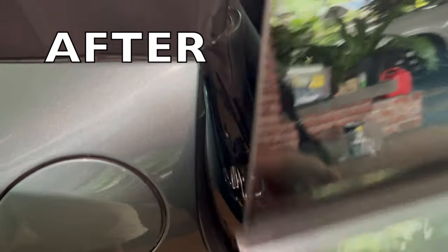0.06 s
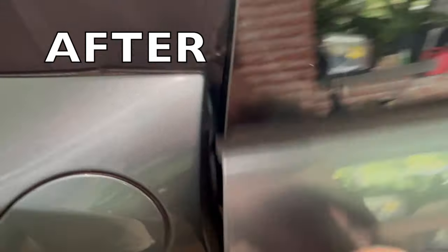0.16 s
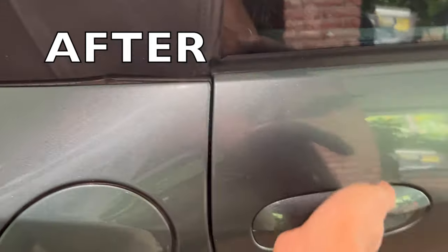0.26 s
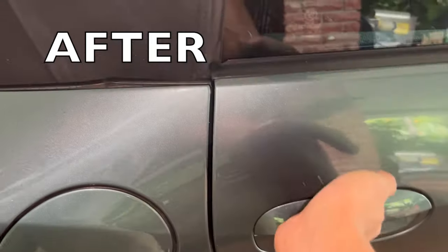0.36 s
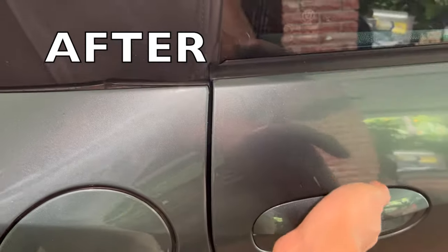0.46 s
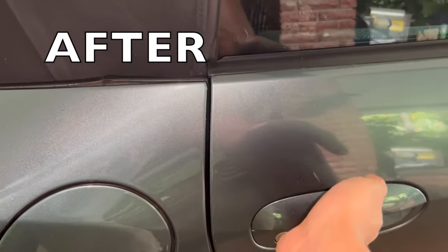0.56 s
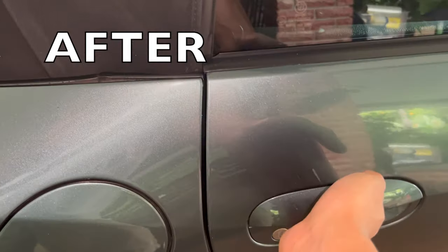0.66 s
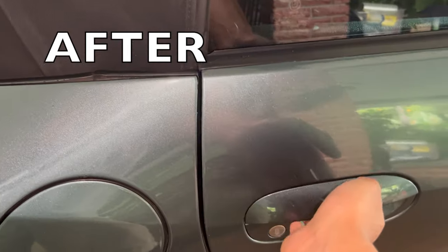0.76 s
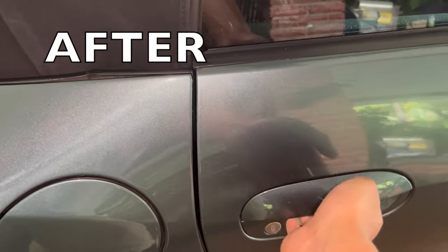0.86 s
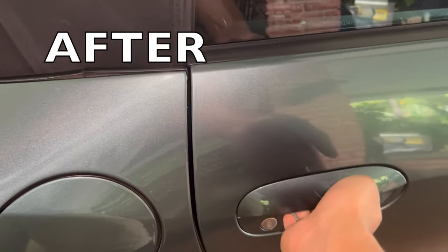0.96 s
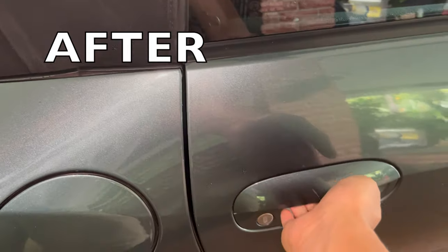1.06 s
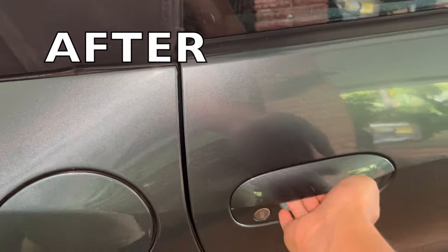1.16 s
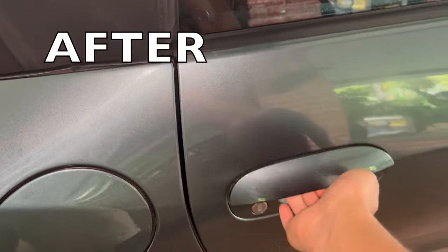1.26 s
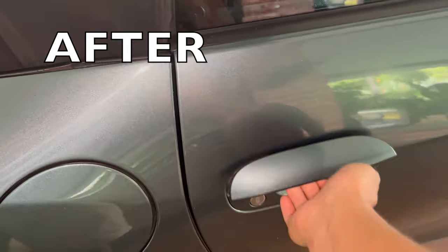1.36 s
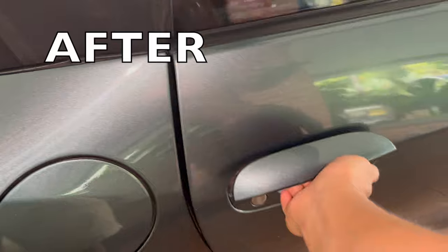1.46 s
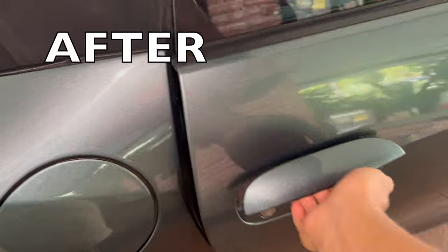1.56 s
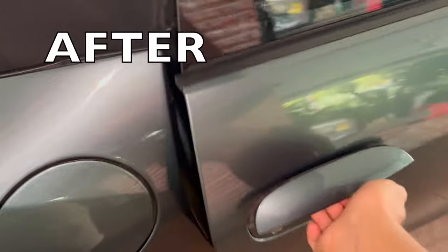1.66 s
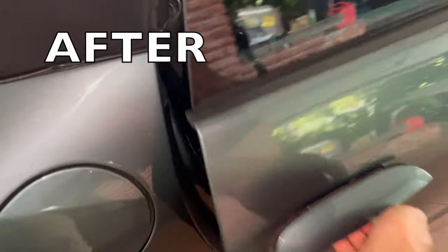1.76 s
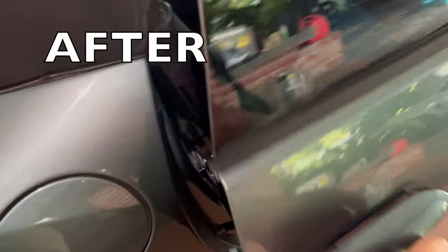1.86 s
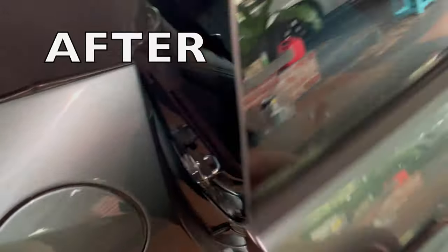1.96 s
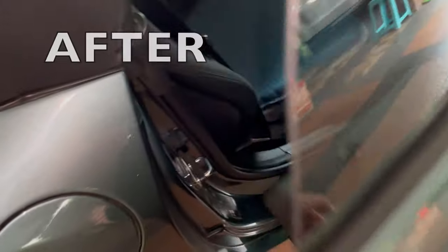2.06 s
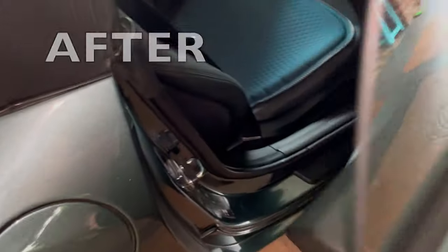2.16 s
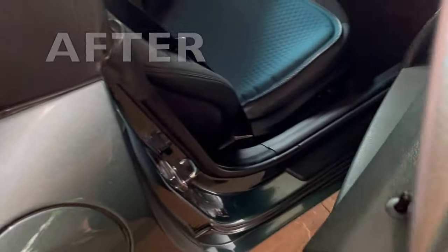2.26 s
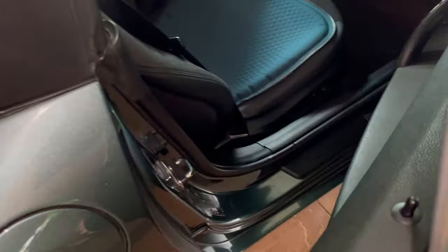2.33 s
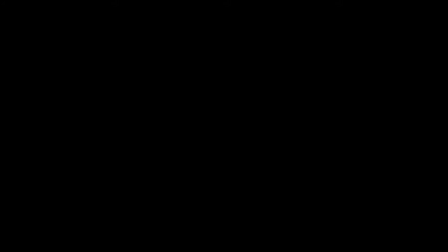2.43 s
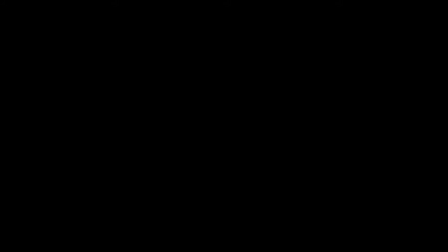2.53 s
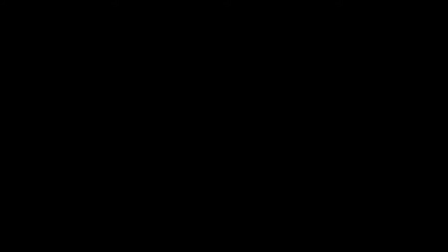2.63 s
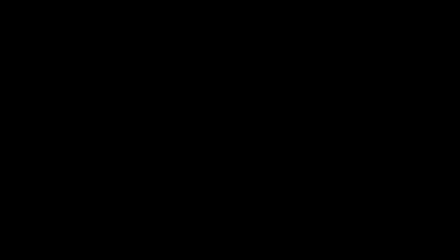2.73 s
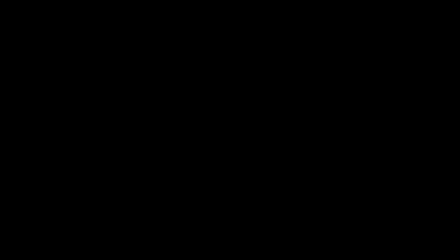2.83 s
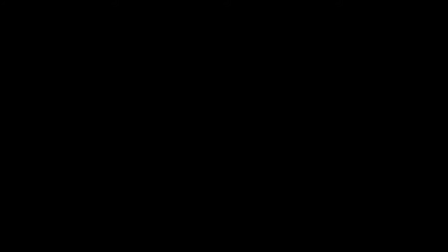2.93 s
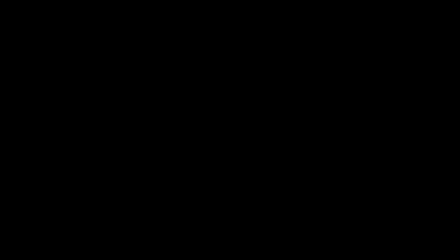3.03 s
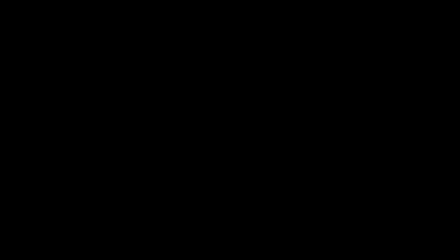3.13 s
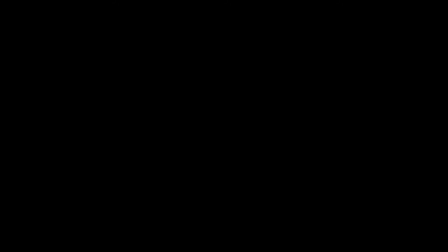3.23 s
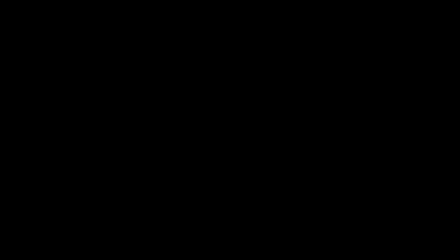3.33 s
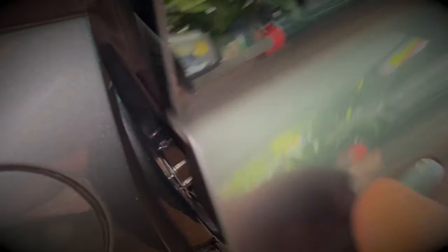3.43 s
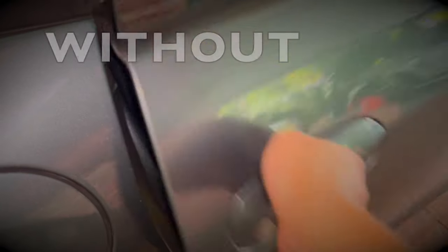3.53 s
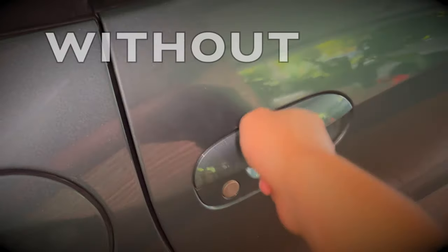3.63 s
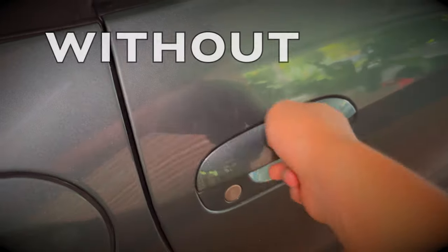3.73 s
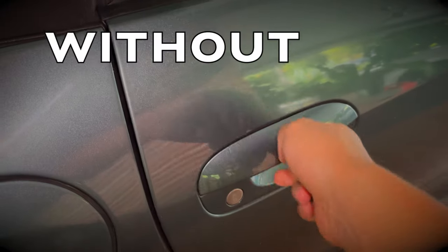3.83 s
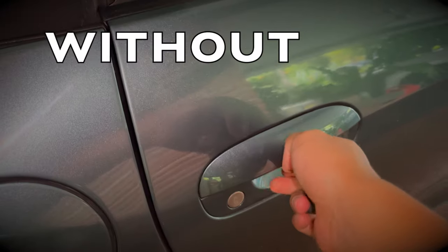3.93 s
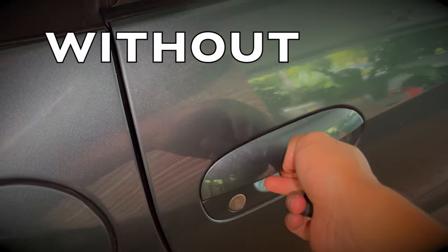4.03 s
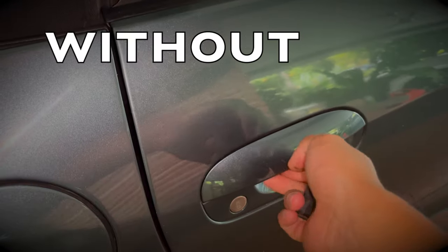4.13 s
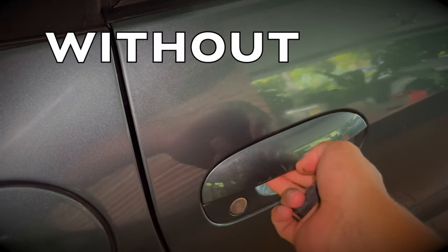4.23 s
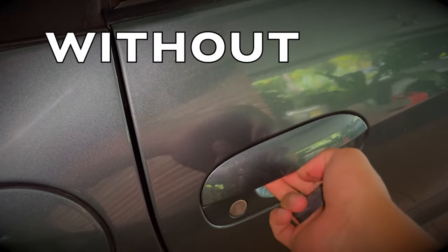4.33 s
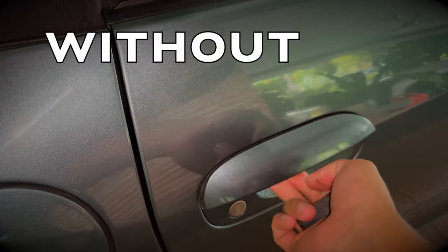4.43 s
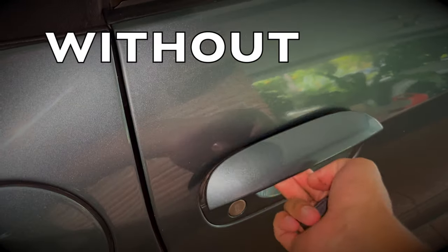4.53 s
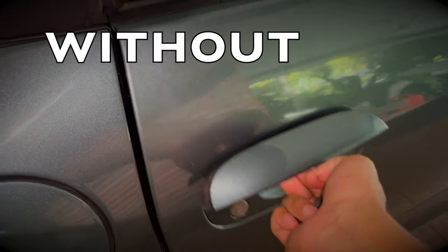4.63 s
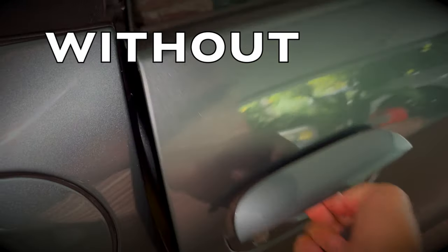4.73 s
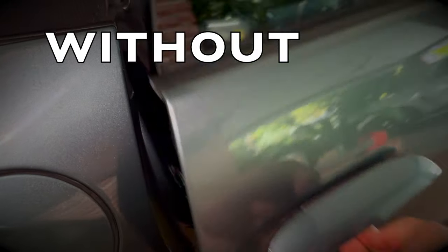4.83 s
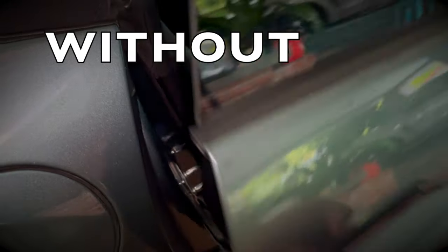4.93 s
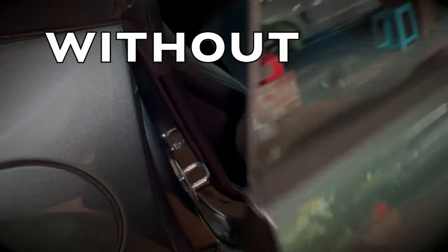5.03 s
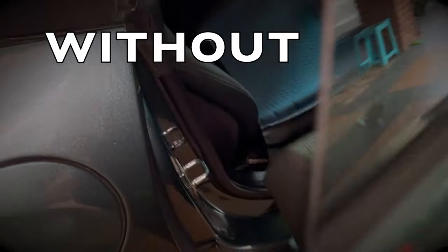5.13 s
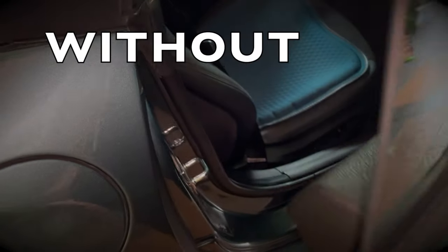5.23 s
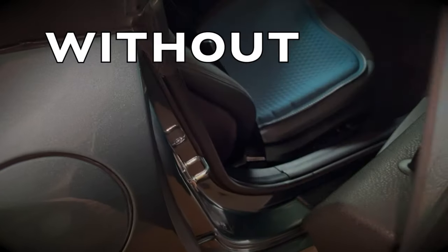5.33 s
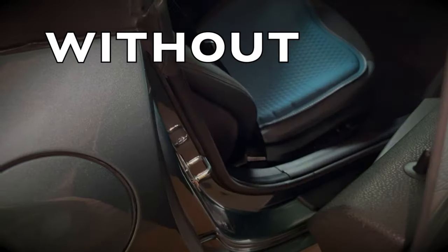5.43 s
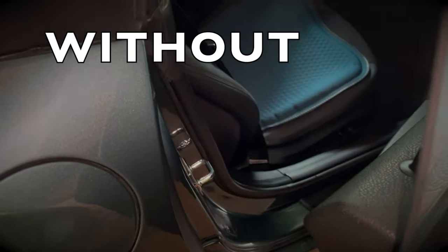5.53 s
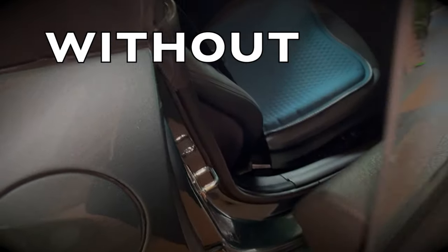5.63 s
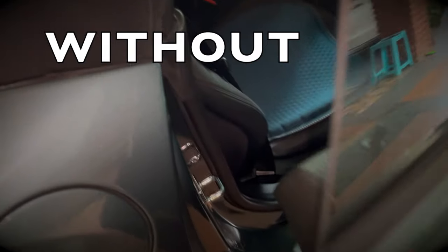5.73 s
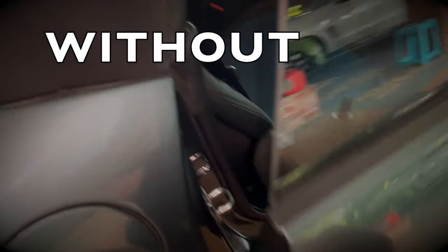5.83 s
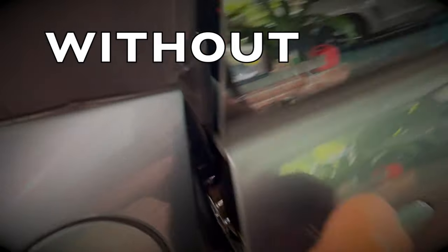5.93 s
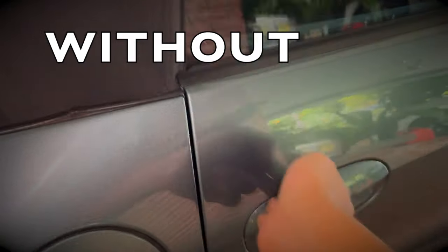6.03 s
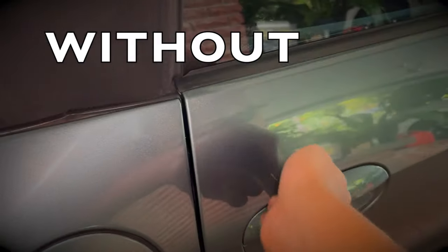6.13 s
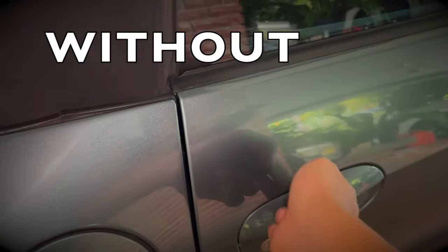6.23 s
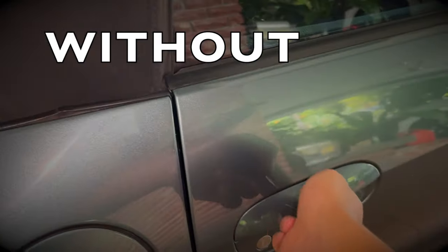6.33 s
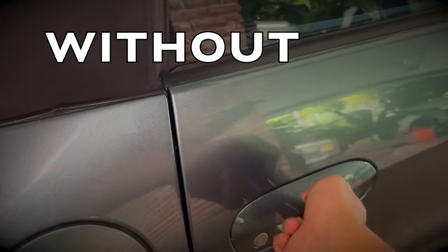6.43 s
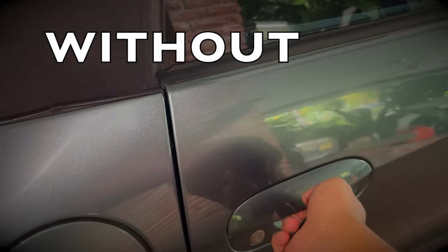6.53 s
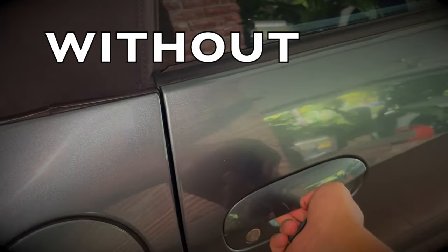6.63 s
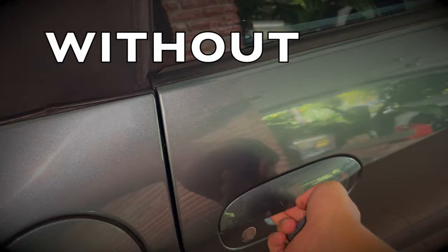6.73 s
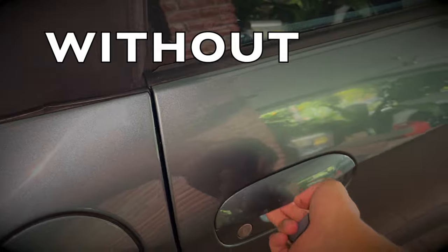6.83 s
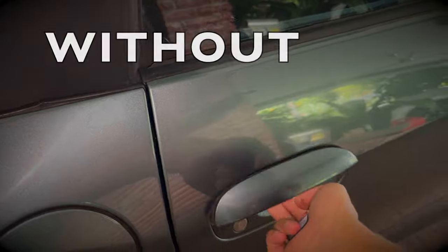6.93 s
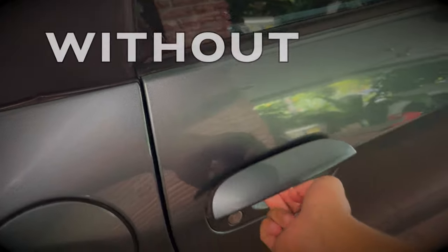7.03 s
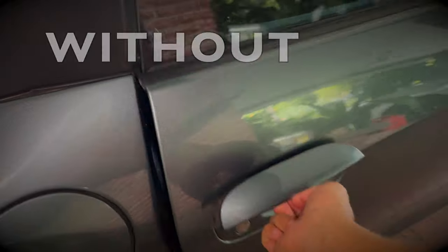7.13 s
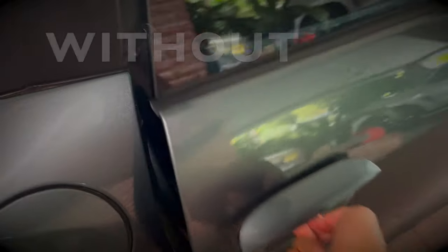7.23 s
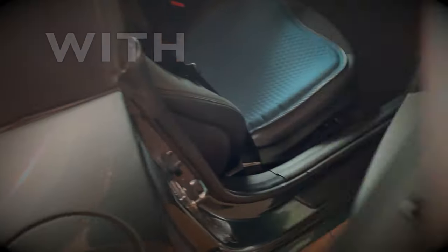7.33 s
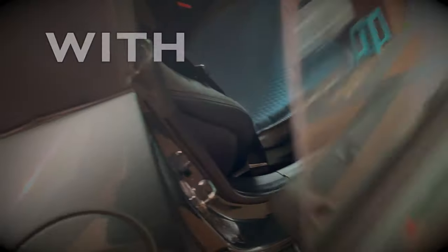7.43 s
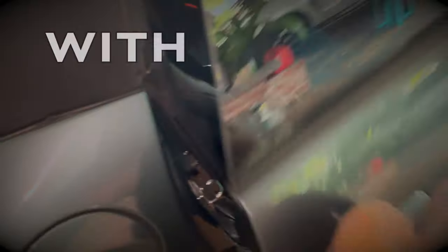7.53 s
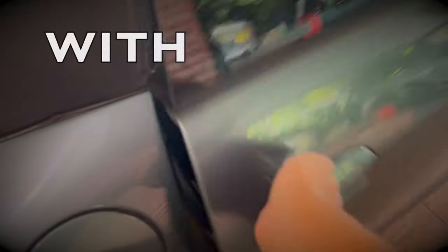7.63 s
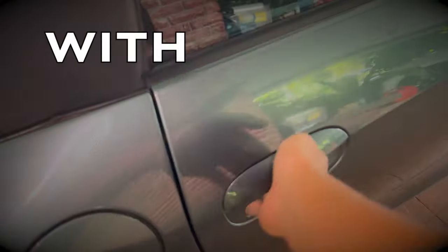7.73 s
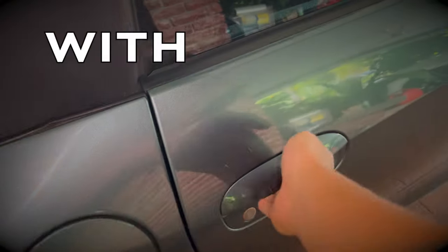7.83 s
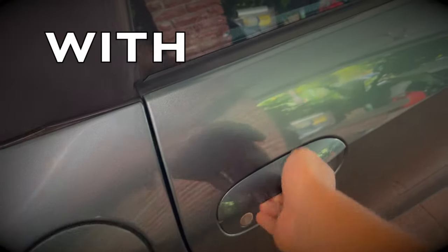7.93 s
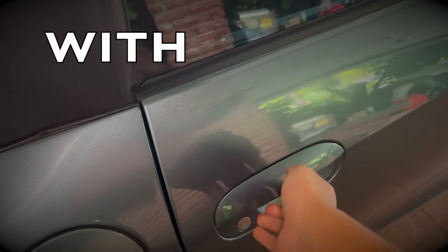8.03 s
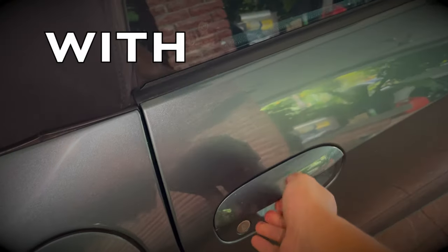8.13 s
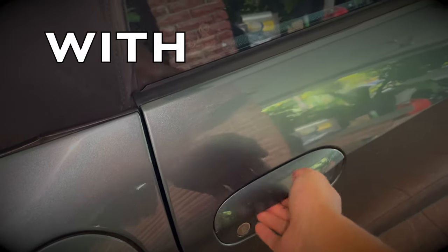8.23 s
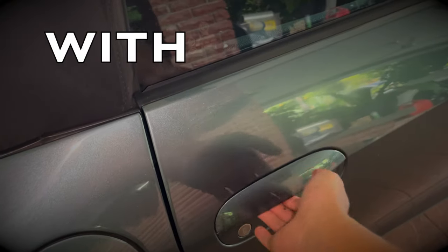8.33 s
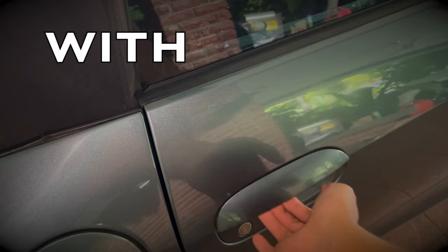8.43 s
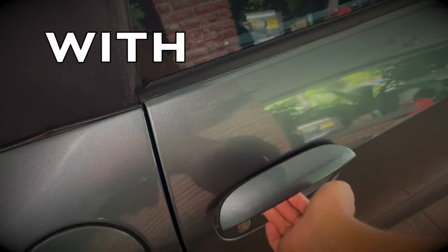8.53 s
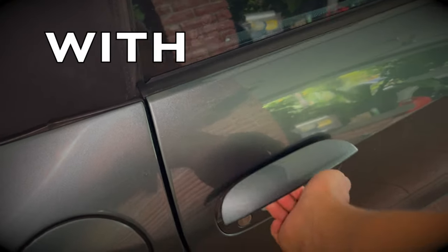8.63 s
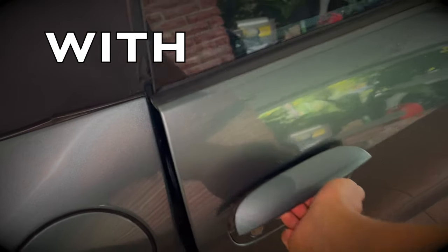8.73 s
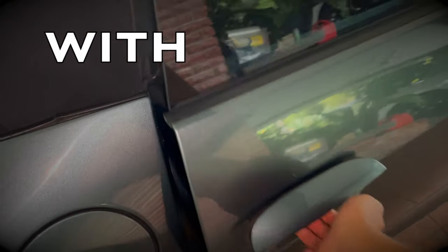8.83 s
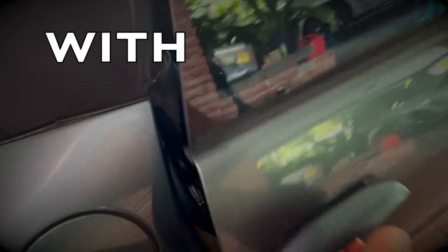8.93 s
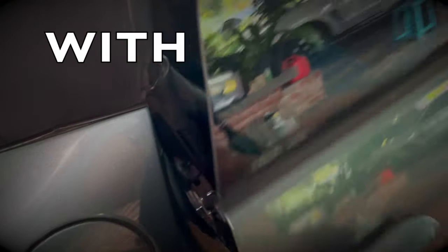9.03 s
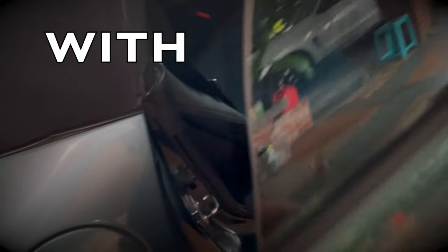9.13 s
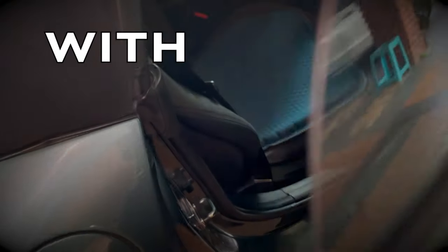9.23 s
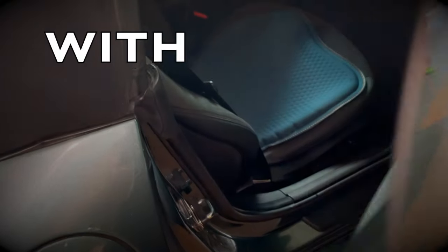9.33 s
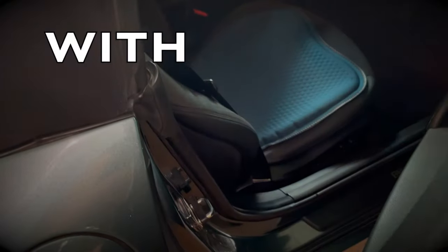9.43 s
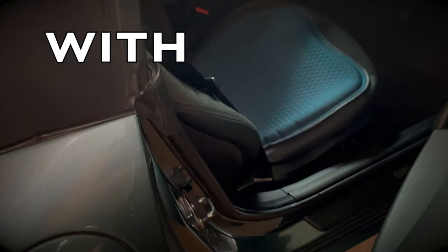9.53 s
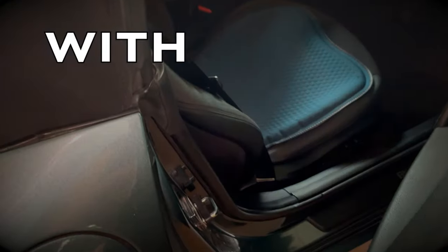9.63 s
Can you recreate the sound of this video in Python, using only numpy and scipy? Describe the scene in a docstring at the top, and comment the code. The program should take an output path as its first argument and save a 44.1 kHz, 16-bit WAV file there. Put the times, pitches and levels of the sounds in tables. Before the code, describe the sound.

A car door slams, its handle clicks and the latch pops open, again and again, with a second of dead silence after the first round.

```python
"""Under a carport with brick walls, a car door is slammed, its lock motor settles, the handle is pulled, the latch lets
go and the door swings open, four times over; three times one hears it reach its stop. Each contact is a burst of noise
(crack) plus decaying sine waves for latch plate, door panel and cabin air, with fading noise as the walls' answer.
Shaped noise makes the distant traffic and air. A phone close by squashes the loudest blows; the sound is cut for a second.
"""
import sys
import numpy as np
from scipy import signal
from scipy.fft import rfft, irfft, next_fast_len
from scipy.io import wavfile
from scipy.ndimage import uniform_filter1d

SR = 44100
rng = np.random.default_rng(int(sys.argv[2]) if len(sys.argv) > 2 else 0)


def transcribe(signal):
    """Save signal, clipped to [-1, 1], as a 16-bit WAV file at the path in sys.argv[1]."""
    frames = np.atleast_2d(signal).T
    limited = np.clip(frames, -1, 1)
    pcm = np.round(limited * 32767).astype(np.int16)
    wavfile.write(sys.argv[1], SR, pcm)


N = 426447
CONTACT_LENGTH = 36000  # longest sound of one contact [samples]
SPLIT_HZ = 5200  # above this a crack is only a brief snap

# When each action happens, and how it differs from its usual self:
# (time [s], stretch of the delays [factor], extra crack [dB], extra knock [dB], extra thud [dB])
SLAM_TIMES = [(.2461, 0.98, -1, 0, 0), (3.5964, 1.057, 0, 2, 0.5), (6.0153, .98, 1, 4, 4),
              (7.6876, 1.03, -3.5, -2, -3)]
LOCK_TIMES = [(.7735, 1, 2, 0, -1), (4.1155, 1.02, 5, 0.07, 1.4), (6.5235, 1.01, 1, -0.73, -2),
              (8.2095, 1.03, 4, 0.97, 0)]
HANDLE_TIMES = [(1.224, 1.06, -5, -5, -11), (4.4106, .82, 0, 3, 2.5), (6.882, .95, -1, 0, 2),
                (8.4449, 1.12, 2, 1.5, 3.5)]
RELEASE_TIMES = [(1.4268, 1.0, -2, -.5, 0), (4.6228, .96, 2.5, 1, 0), (7.0664, 1.04, 0.5, .5, -1),
                 (8.6395, 1.02, -1, -1, 1)]
RATTLE_TIMES = [(1.5998, 1.38, 4.5, 8, 2.5), (4.792, 1.06, 0, -8, -0.5), (7.229, 0.95, -2, -3.5, 1),
                (8.8181, .92, 4, 11, 6)]
STOP_TIMES = [(2.1015, 1.22, -3, 0, -3), (5.1843, 1.03, -1, -1.3, 0), (9.2917, .74, 2.5, 0.028, 2)]
# Actions that keep their usual pace: (time [s], extra crack [dB], extra knock [dB], extra thud [dB])
TICK_TIMES = [(1.3087, 4, 9, -6), (4.4789, -12, -2, 11), (6.9576, 0, 7, 3), (8.5381, -16, -7.5, 0)]
TAP_TIMES = [(.1374, -15, -22, -18.5), (.1962, -23, -18, -8), (4.703, 0, 2, -4.5), (7.1494, -2, 5.5, 2),
             (9.2753, 0, -18, -23)]
FALL_BACK_TIMES = [(1.5471, -1, 1, 0.24), (4.7394, 4.5, -1.9, 0.96), (7.1885, 3, -2.6, -1.8),
                   (8.7696, -6, 2.5, 0.72)]

# The run of contacts inside each action, at its usual pace and strength:
# (delay [s], crack [dB], knock [dB], panel [dB], cabin [dB], snap over the crack's treble [dB])
SLAM_CONTACTS = [(0, -7.5, -10, -15, -32, -15), (.022, -2, -10.5, -15, -7, -2),
                 (.049, -6.5, -11, -5, -8.5, -.5)]  # first catch, second catch, door seats
LOCK_CONTACTS = [(0, -42, -20, -21, -31, -12), (.085, -40.5, -51, -35, -35.5, -2.5),
                 (.1, -42.5, -65, -37, -31, 0), (.12, -44.5, -59, -36, -24, -1.5)]  # a dull knock, three faint ticks
HANDLE_CONTACTS = [(0, -20.5, -37.5, -24, -38, -2), (.009, -22, -20, -20.5, -23, -2.2)]  # lift, slack taken up
TICK_CONTACTS = [(0, -45, -31.5, -35, -34, -2), (.021, -44.5, -42, -54.5, -50, -2)]  # the rod behind the handle ticks twice
RELEASE_CONTACTS = [(0, -9.5, -6, -26.5, -30.5, 0), (.0044, -12, -8.5, -4, -9, -5)]  # pawl slips, door springs off its seal
TAP_CONTACTS = [(0, -36.5, -29, -21.5, -37, -2)]  # one soft bump in the door
FALL_BACK_CONTACTS = [(0.0019, -42.5, -20.5, -19, -32.5, -6.5)]  # the handle drops back on its spring
RATTLE_CONTACTS = [(0, -33.5, -45, -27, -28, -5), (.018, -41, -34.5, -30.5, -33.5, 5),
                   (.034, -41.5, -25, -30, -34, -6)]  # three clacks of the loose latch
STOP_CONTACTS = [(0, -24, -33, -27.5, -53, -2.5), (.016, -15, -19.5, -16, -32.5, -0.5)]  # the strap touches, then takes the weight

# Notes at which each part rings: (frequency [Hz], relative level [dB], time to fall 60 dB before damping [s])
PLATE_MODES = [(398.1, 1, 0.13), (463.6, -8, 0.14), (523.5, 3.5, 0.079), (606.3, -5.5, .12),
               (714, -5.5, 0.054), (794, -9, 0.081), (971, -8, 0.078), (1081.5, -4.5, 0.076),
               (1237, -3, 0.035), (1429, -10.5, 0.049), (1663, -12.5, 0.077), (1890, -14, 0.027),
               (2136, -9, 0.041), (2430, -13, 0.044), (2602, -14, .06), (2790, -17, 0.043),
               (4560, -11, 0.052), (4970, -11.5, 0.085)]
PANEL_MODES = [(151.2, -8.5, 0.45), (181.5, -2, 0.18), (206.6, -6.5, 0.38), (243.46, -8, 0.67),
               (267.4, -4, 0.49), (302.7, -3.5, 0.2), (358.5, -1, .15)]
CABIN_MODES = [(41.4, -19, .5), (58.85, 1, .75), (76, -15.5, 0.26), (90.83, 3, 0.53), (107, -8.5, 0.51),
               (121.7, -1, 0.4)]
# Blow-to-blow change of these notes, as a standard deviation: (plate [dB], panel [dB], cabin [dB])
MODE_SCATTER = (2.5, 1.2, .8)

# How strongly each kind of contact drives the notes: (frequency [Hz], drive [dB])
SLAM_DRIVE = [(60, 5), (100, 6.5), (200, 1), (400, -1.5), (900, -2.5), (2500, 6.5), (4500, -6.5)]
LOCK_DRIVE = [(60, 4.5), (100, 1), (150, -7.5), (250, -9), (310, 6.5), (370, 4.5), (450, -4), (600, 6),
              (1100, 3.5), (2500, -8.5), (4500, -19)]
HANDLE_DRIVE = [(60, -6), (110, -4), (250, -1), (370, 0), (800, -3.5), (2500, 3.5), (4500, -7.5)]
RELEASE_DRIVE = [(60, 0), (90, -1.5), (120, 1.5), (180, 2.5), (260, 3), (400, -2), (535, 1), (750, -1.5),
                 (1100, -0.5), (2500, -3.5), (4500, -8.5)]
FALL_BACK_DRIVE = [(60, -5.5), (200, -5), (260, -7.5), (320, 7.5), (480, 1), (800, -9.5), (2500, -7)]
RATTLE_DRIVE = [(60, -4.5), (250, -3), (500, -7), (900, 6), (2500, 3.5), (4500, -4)]
STOP_DRIVE = [(60, -3), (125, 12.5), (180, -4), (260, 1.5), (365, 4.5), (700, -3.5), (1400, 4.5),
              (2500, 16.5), (4500, 3)]

# Tone colour of each kind of crack: (frequency [Hz], relative level [dB])
SLAM_CRACK = [(410, -27.5), (700, 2.5), (1100, -1.5), (2000, -9.5), (2700, -10.5), (4100, -10.5),
              (5700, -13.5), (7000, -11.5), (9800, -16), (12300, -18.5), (16000, -36)]
CLICK_CRACK = [(410, -18), (700, -3.5), (1230, -11.5), (1660, -20), (3300, -23), (6000, -28.5),
               (7200, -23.5), (9700, -28.5), (11700, -22), (13500, -26), (16000, -52)]
RATTLE_CRACK = [(410, -19), (900, 4.5), (2000, -5), (3600, -7.5), (4800, -5), (5800, -15), (9000, -16),
                (12500, -13), (16000, -37)]
STOP_CRACK = [(410, -5.5), (700, 6), (1500, -5.5), (2500, -7.5), (3400, -11), (4100, -8), (5800, -14.5),
              (8500, -13), (12900, -14), (16000, -36.5)]

# How alike left and right are in the direct crack: (frequency [Hz], likeness [-1 to 1])
CRACK_LIKENESS = [(700, 0.43), (2500, .6), (5000, 0.82), (8500, 0.99)]
# How alike left and right are in the walls' answer and the yard: (frequency [Hz], likeness [-1 to 1])
SPREAD_OUT_LIKENESS = [(60, 0.96), (180, 0.82), (400, .6), (1000, 0.064), (4000, .15), (6500, .4),
                       (8500, 0.94), (15000, 1)]
# How long the walls' answer lasts: (frequency [Hz], time to fall 60 dB [s])
WALL_DECAY = [(60, 0.96), (250, 0.48), (800, 0.59), (2000, 0.62), (5000, 0.68), (9000, 0.47), (14000, 0.55)]
# Tone colour of the walls' answer: (frequency [Hz], gain [dB])
WALL_TONE = [(40, -15), (200, 7), (800, -2), (3000, -3.5), (7000, -8.5), (11000, -11), (15000, -16)]
# Tone colour of the yard: (frequency [Hz], relative level [dB])
YARD_TONE = [(15, -51.5), (25, -18.5), (39, -12), (90, -3.5), (139, -5), (213, -9.5), (286, -12),
             (415, -18), (1280, -26.5), (3500, -36.5), (7090, -46.5), (10000, -52.5), (12400, -54.5),
             (15000, -74)]
# Loudness of the yard over time: (time [s], level [dB])
YARD_LEVEL = [(0, -42.5), (0.199, -37), (1.1, -41.5), (1.9, -42.5), (2.4, -44), (3.461, -40.5), (4.4, -40),
              (5.0, -43), (5.5, -44.5), (5.95, -41.5), (6.8, -40), (7.5, -43), (9.102, -42.5),
              (9.67, -43.5)]
# How far left lags right around the phone's body: (frequency [Hz], lag [radians])
PORT_LAG = [(100, .03), (1000, .35), (4000, 1.4), (7500, 0.82), (9800, 2.9), (12000, 5.6), (15500, 4.8)]
# The silent gap: (start [s], end [s])
SILENT_GAP = (2.396, 3.464)


def door():
    """All the door's actions, each a run of short contacts, added together."""
    return (slam() + lock_motor() + handle_pull() + rod_ticks() + latch_release()
            + soft_taps() + handle_fall_back() + latch_rattle() + door_stop())


def slam():
    """The door hits its latch and seats; hard edges make a sharp crack and the panel rings freely."""
    return contacts(spelled_out(SLAM_TIMES, SLAM_CONTACTS), SLAM_CRACK, SLAM_DRIVE,
                    burst=0.076, spread=0.02, damping=0.91, rise=0.016, wet_db=-3.5, edge=0.0004)


def lock_motor():
    """The lock motor settles with a dull knock and faint ticks, all soft-edged."""
    return contacts(spelled_out(LOCK_TIMES, LOCK_CONTACTS), STOP_CRACK, LOCK_DRIVE,
                    burst=0.06, spread=0.011, damping=1.58, rise=0.013, wet_db=0.5, edge=0.0025)


def handle_pull():
    """The handle lifts and takes up its slack, while the hand on it damps the ringing."""
    return contacts(spelled_out(HANDLE_TIMES, HANDLE_CONTACTS), CLICK_CRACK, HANDLE_DRIVE,
                    burst=0.056, spread=0.01, damping=1.5, rise=0.019, wet_db=-2.0, edge=0.0023)


def rod_ticks():
    """The rod behind the handle ticks twice, well damped."""
    return contacts(spelled_out(TICK_TIMES, TICK_CONTACTS), CLICK_CRACK, HANDLE_DRIVE,
                    burst=0.056, spread=0.018, damping=2.3, rise=0.017, wet_db=-1.5, edge=0.0018)


def latch_release():
    """The pawl slips and the door springs off its seal, a single push on the panel."""
    return contacts(spelled_out(RELEASE_TIMES, RELEASE_CONTACTS), CLICK_CRACK, RELEASE_DRIVE,
                    burst=0.03, spread=0.0071, damping=2.17, rise=0.0057, wet_db=-2.5, edge=0.00059,
                    panel_wave=False)


def soft_taps():
    """Soft bumps in the door that die away fast."""
    return contacts(spelled_out(TAP_TIMES, TAP_CONTACTS), CLICK_CRACK, HANDLE_DRIVE,
                    burst=0.04, spread=0.01, damping=2.2, rise=0.0066, wet_db=-7.5, edge=0.0015)


def handle_fall_back():
    """The handle drops back on its spring with one damped knock."""
    return contacts(spelled_out(FALL_BACK_TIMES, FALL_BACK_CONTACTS), RATTLE_CRACK, FALL_BACK_DRIVE,
                    burst=0.05, spread=0.012, damping=1.9, rise=0.0068, wet_db=-3, edge=0.002)


def latch_rattle():
    """The loose latch clacks three times, heavily damped."""
    return contacts(spelled_out(RATTLE_TIMES, RATTLE_CONTACTS), RATTLE_CRACK, RATTLE_DRIVE,
                    burst=0.078, spread=0.015, damping=2.4, rise=0.011, wet_db=-4, edge=0.0027)


def door_stop():
    """The strap touches, then takes the door's weight; the rubber stop damps the ringing."""
    return contacts(spelled_out(STOP_TIMES, STOP_CONTACTS), STOP_CRACK, STOP_DRIVE,
                    burst=0.08, spread=0.013, damping=1.85, rise=0.028, wet_db=-2.0, edge=0.0018)


def spelled_out(actions, steps):
    """Every contact of every action; the thud moves panel and cabin together."""
    table = []
    for start, *rest in actions:
        stretch = rest[0] if len(rest) == 4 else 1
        more_crack, more_knock, thud = rest[-3:]
        for delay, crack, knock, panel, cabin, snap in steps:
            table.append((start + stretch * delay, crack + more_crack, knock + more_knock,
                          panel + thud, cabin + thud, snap))
    return table


def contacts(table, colour, drive, burst, spread, damping, rise, wet_db, edge, panel_wave=True):
    """Each blow makes a noisy crack, rings plate and panel and slowly pumps the cabin air, near and off the walls.

    burst: fall of the crack by 60 dB [s]; spread: span of the rebounds [s]; damping: speed-up of the decay;
    rise: build-up of the cabin air [s]; edge: softness of the blow [s]; wet_db: gain of the walls' answer [dB]
    """
    near, far = np.zeros((2, 2, N + CONTACT_LENGTH))

    def bands(hz):
        """Split the crack's colour into its body and its treble snap."""
        treble = hz ** 4 / (hz ** 4 + SPLIT_HZ ** 4)
        return gain(along(colour, hz)) * np.array([1 - treble, treble])

    # the click sits 300 samples in, leaving room for the filter's ringing ahead of it
    clicks = filtered(signal.unit_impulse(CONTACT_LENGTH, 300), bands)
    scale = np.linalg.norm(clicks.sum(0))
    for start, crack_db, knock_db, panel_db, cabin_db, snap_db in table:
        envelopes = [chatter(burst, spread, edge), chatter(0.53 * burst, 0.23 * spread, edge)]
        fade = gain([[crack_db], [crack_db + snap_db]]) * envelopes / scale
        noise = rng.standard_normal((2, 1, fade.shape[1]))
        crack = (fade * filtered(noise, bands)).sum(1)

        plate = ring(PLATE_MODES, drive, damping, rise / 7 + edge, MODE_SCATTER[0])
        knock = gain(knock_db + 8.5) * rebound(plate, spread)
        panel = ring(PANEL_MODES, drive, damping, rise / 2.5, MODE_SCATTER[1], panel_wave)
        cabin = ring(CABIN_MODES, drive, damping, rise, MODE_SCATTER[2])
        body = gain(panel_db + 6.5) * panel + gain(cabin_db + 2.5) * cabin

        # the plate sits to the right of the phone, the big panel to the left
        at = round(start * SR)
        near[:, at:at + CONTACT_LENGTH] += knock * gain([[-1.1], [1.1]]) + body * gain([[.6], [-.6]])
        direct = ports(crack, [(1000, 0)], CRACK_LIKENESS)
        near[:, at:at + fade.shape[1]] += direct * gain([[-.6], [.6]])

        # the walls get the crack's energy as one click, so that its tail stays even
        crack_click = np.linalg.norm(fade, axis=1) @ clicks
        answer = walls(crack_click + 0.83 * knock + 0.37 * body)
        far[:, at:at + CONTACT_LENGTH] += gain(wet_db) * answer
    return near[:, :N] + ports(far[:, :N], WALL_TONE, SPREAD_OUT_LIKENESS)


def chatter(burst, spread, edge):
    """Loudness shape of a crack: a fading crunch broken up by five weaker rebounds."""
    t = np.arange(SR // 6) / SR
    after = t - spread * rng.random((5, 1))
    strength = gain(-7.5 - 15 * rng.random((5, 1)))
    rebounds = strength * (after >= 0) * gain(-60 * np.abs(after) / 0.0093)
    return (gain(-60 * t / burst) + rebounds.sum(0)) * (1 - np.exp(-t / edge))


def rebound(x, spread):
    """The loose plate is struck again three times, each weaker than the first blow."""
    again = [gain(-3 - 12 * size) * np.roll(x, int(late * spread * SR)) for late, size in rng.random((3, 2))]
    return x + sum(again)


def ring(modes, drive, damping, rise, scatter_db, wave=True):
    """Decaying notes at new strengths: a spreading bending wave alternates their signs, a single push does not."""
    hz, db, t60 = np.transpose(modes)[:, :, None]
    length = min(CONTACT_LENGTH, int(1.2 * SR * t60.max() / damping))
    t = np.arange(length) / SR
    strength = db + along(drive, hz) + scatter_db * rng.standard_normal(db.shape)
    level = strength - 60 * damping * t / t60
    sign = (-1 if wave else 1) ** np.arange(len(modes))[:, None]
    notes = (sign * gain(level) * np.sin(2 * np.pi * hz * t)).sum(0)
    build_up = 1 - np.exp(-(t / rise) ** 2)
    return np.pad(notes * build_up / np.sqrt(len(modes)), (0, CONTACT_LENGTH - length))


def walls(x):
    """The brick walls answer with a noise tail that dies at its own speed at each pitch."""
    noise = rng.standard_normal((2, CONTACT_LENGTH))
    hz, t, grid = signal.stft(noise, SR, nperseg=256)
    fading = grid * gain(-60 * t / along(WALL_DECAY, hz)[:, None])
    tail = signal.istft(fading, SR, nperseg=256)[1][:, :CONTACT_LENGTH]
    tail /= np.linalg.norm(tail, axis=1, keepdims=True)
    late = np.pad(x, (200, 0))  # the answer starts 200 samples later
    return signal.fftconvolve(late[None], tail, axes=1)[:, :CONTACT_LENGTH]


def yard():
    """Distant traffic rumble and air: coloured noise in patches of changing strength."""
    grid = signal.stft(rng.standard_normal((2, N)), nperseg=2048)[2]
    patches = rng.standard_normal(grid.shape[1:])
    patches = uniform_filter1d(patches, size=5, axis=0)  # smooth across pitch
    patches = uniform_filter1d(patches, size=3, axis=1)  # smooth across time
    pair = signal.istft(grid * gain(2.9 * unit(patches)), nperseg=2048)[1][:, :N]
    time, db = np.transpose(YARD_LEVEL)
    level = gain(np.interp(np.arange(N) / SR, time, db))
    # a little stronger on the left
    return level * unit(ports(pair, YARD_TONE, SPREAD_OUT_LIKENESS)) * gain([[1.2], [-1.2]])


def ports(pair, spectrum, alike):
    """Two unrelated signals, coloured and mixed to a left and right of the given likeness."""
    def shares(hz):
        """Middle and side parts whose balance sets the likeness."""
        turn = np.arccos(np.clip(along(alike, hz), -1, 1)) / 2
        return gain(along(spectrum, hz)) * [np.cos(turn), np.sin(turn)]

    mid, side = filtered(pair, shares)
    return np.array([mid + side, mid - side])


def gain(db):
    """The factor that belongs to a level in dB."""
    return 10 ** (np.asarray(db) / 20)


def unit(x):
    """Bring x to an average (rms) strength of 1."""
    return x / np.sqrt(np.mean(x ** 2) + 1e-20)


def along(points, hz):
    """Read a curve of (frequency [Hz], value) points on a log frequency axis."""
    f, v = np.transpose(points)
    return np.interp(np.log(hz + 1), np.log(f + 1), v)


def filtered(x, response):
    """Reshape x by a response that depends on frequency."""
    n = x.shape[-1]
    m = next_fast_len(n + 8192)  # extra room keeps the end from wrapping onto the start
    return irfft(rfft(x, m) * response(np.fft.rfftfreq(m, 1 / SR)), m)[..., :n]


def scene():
    """The door in its yard."""
    return door() + yard()


def record(dry):
    """The phone's two spaced ports, soft clipping near full scale, a top limit and the silent gap."""
    sides = np.array([[1], [-1]])
    spaced = filtered(dry, lambda hz: np.exp(-.5j * along(PORT_LAG, hz) * sides))
    clipped = spaced / (1 + np.abs(spaced) ** 8) ** (1 / 8)
    limited = filtered(clipped, lambda hz: hz < 16000)
    t = np.arange(N) / SR
    outside_gap = np.maximum(SILENT_GAP[0] - t, t - SILENT_GAP[1])
    gate = np.clip(outside_gap / 0.011, 0, 1)  # 11 ms fades
    return gate * limited


dry = scene()
out = record(dry)
transcribe(out)
```